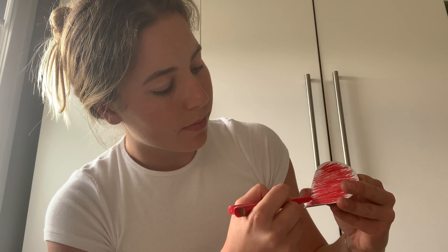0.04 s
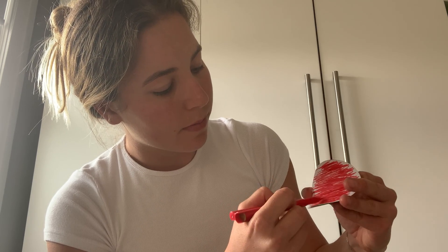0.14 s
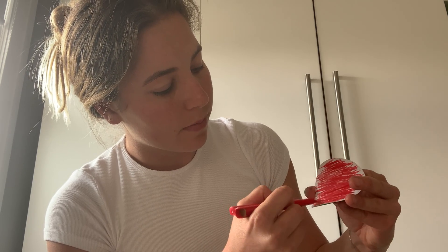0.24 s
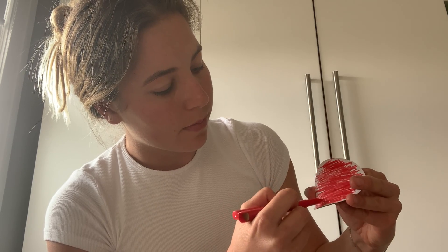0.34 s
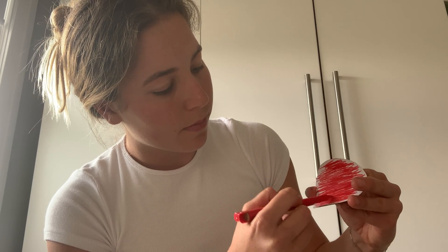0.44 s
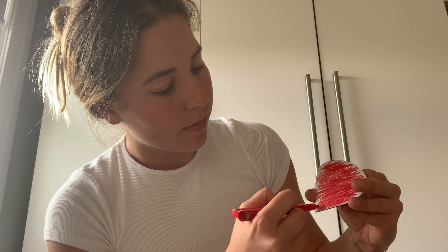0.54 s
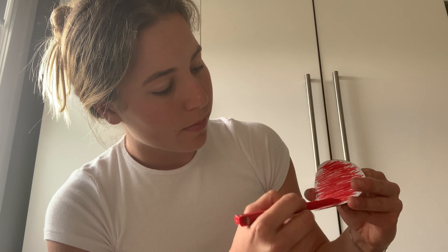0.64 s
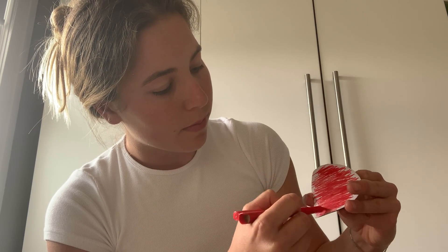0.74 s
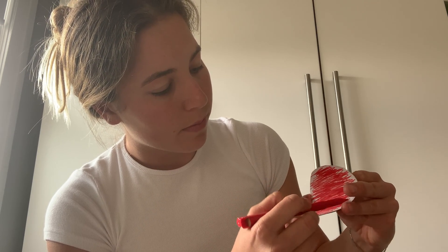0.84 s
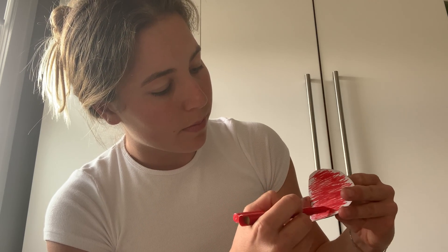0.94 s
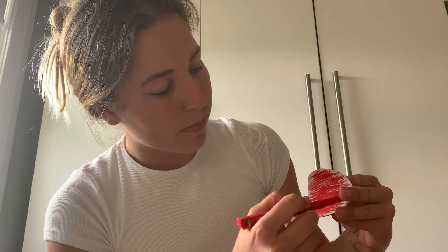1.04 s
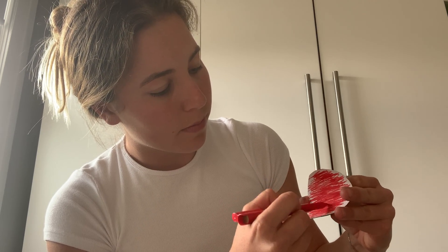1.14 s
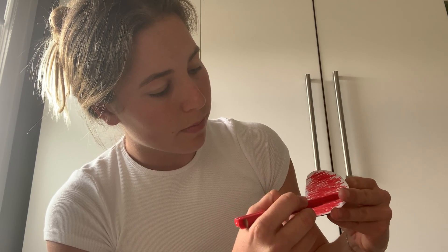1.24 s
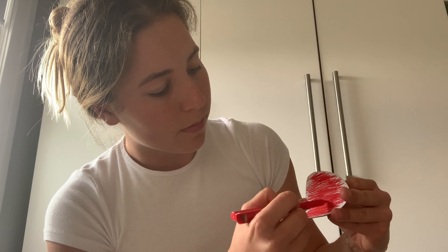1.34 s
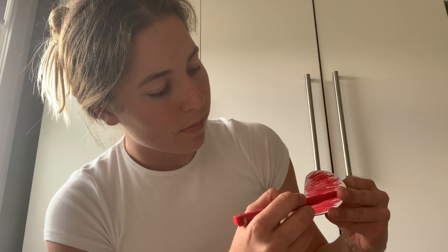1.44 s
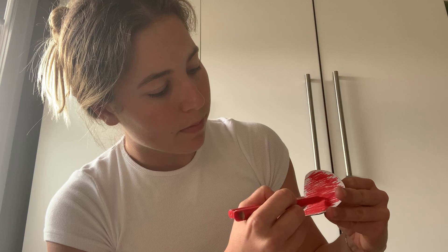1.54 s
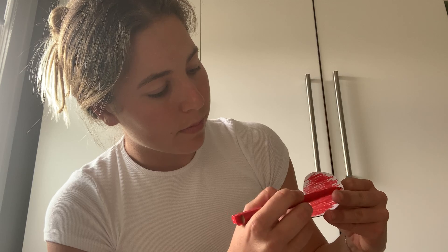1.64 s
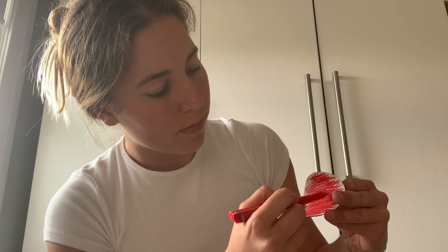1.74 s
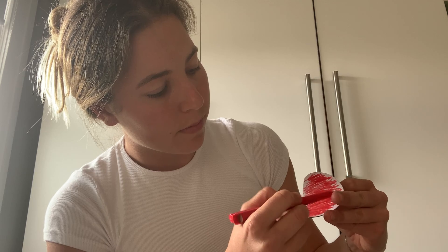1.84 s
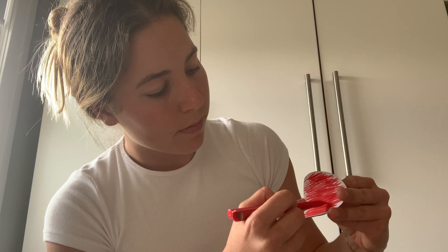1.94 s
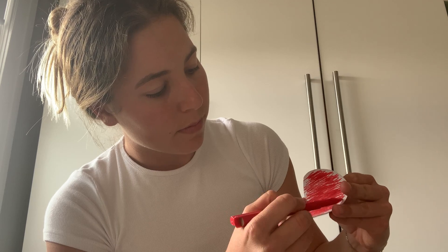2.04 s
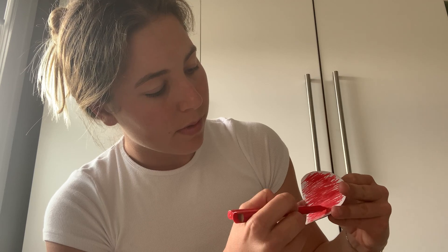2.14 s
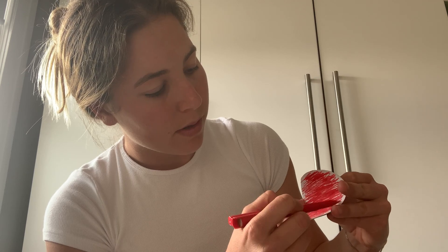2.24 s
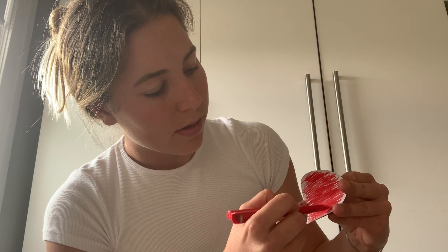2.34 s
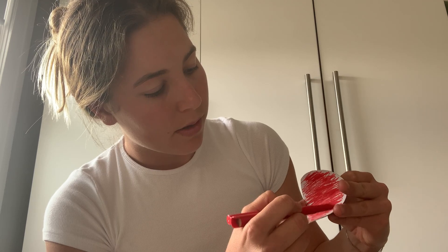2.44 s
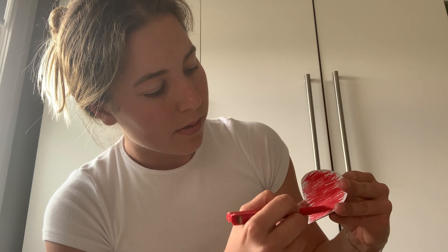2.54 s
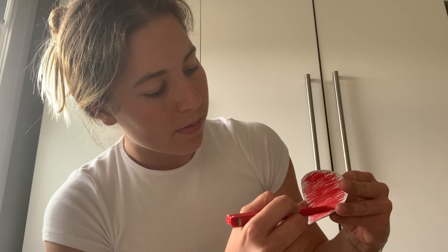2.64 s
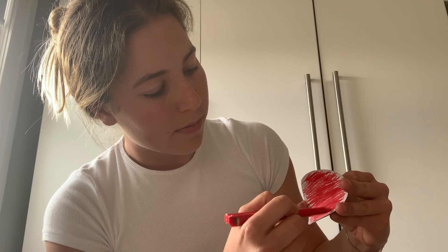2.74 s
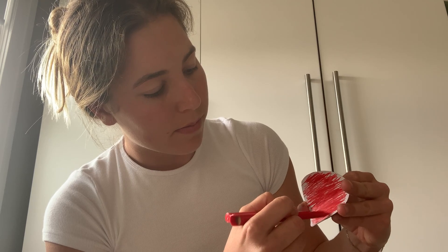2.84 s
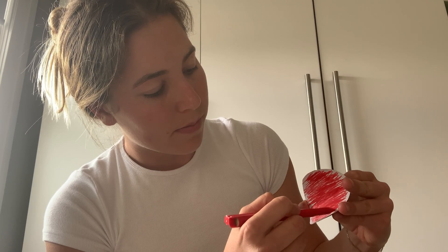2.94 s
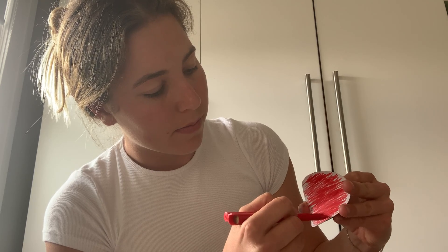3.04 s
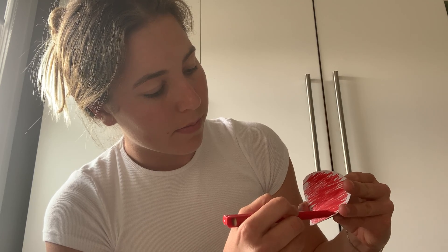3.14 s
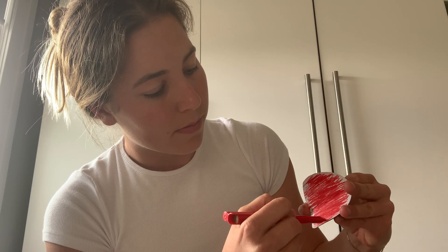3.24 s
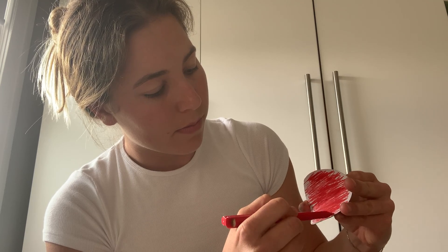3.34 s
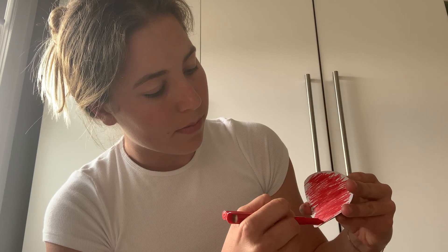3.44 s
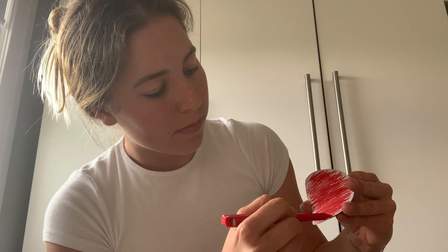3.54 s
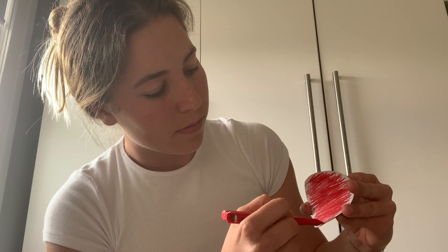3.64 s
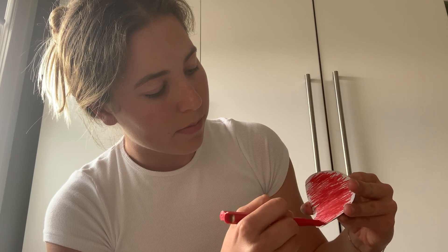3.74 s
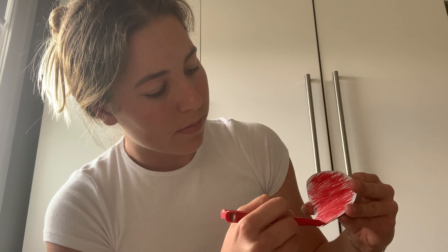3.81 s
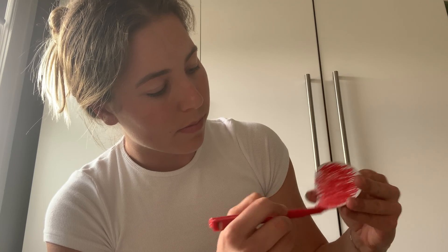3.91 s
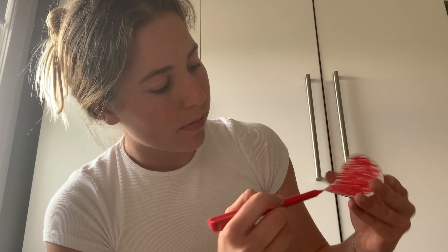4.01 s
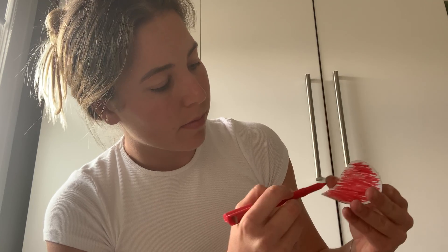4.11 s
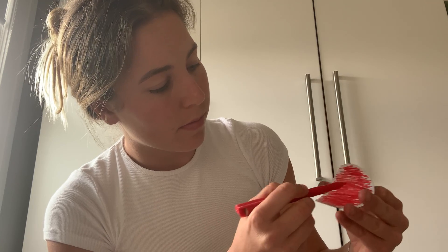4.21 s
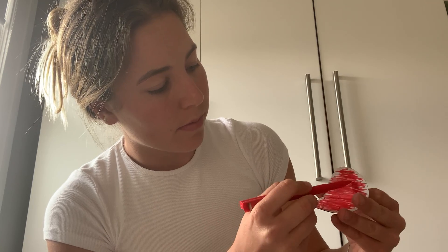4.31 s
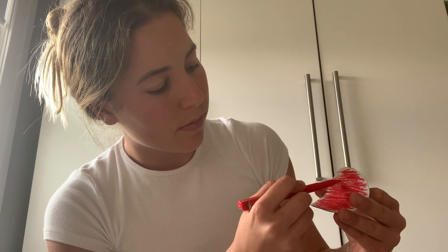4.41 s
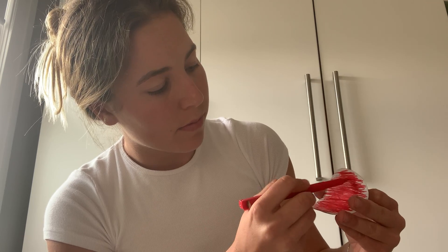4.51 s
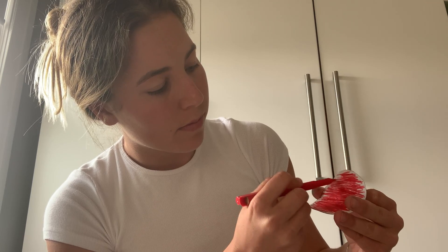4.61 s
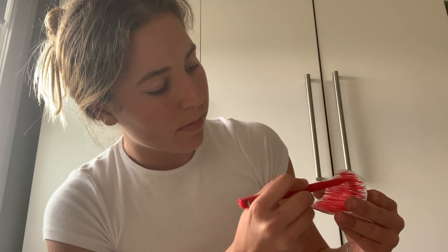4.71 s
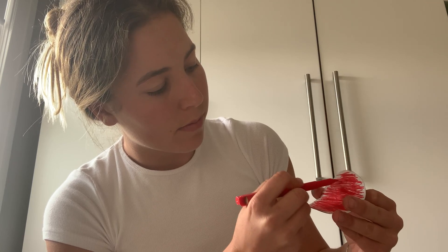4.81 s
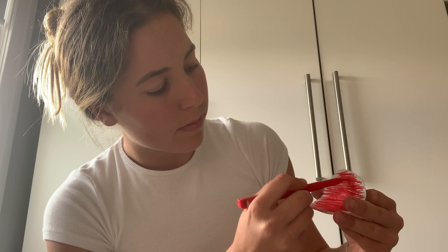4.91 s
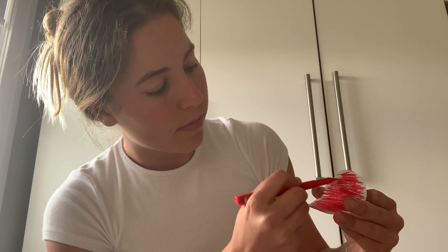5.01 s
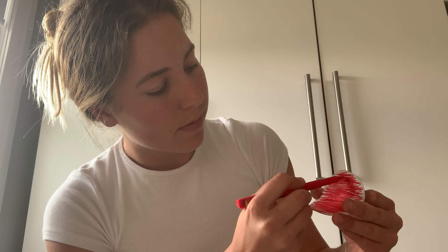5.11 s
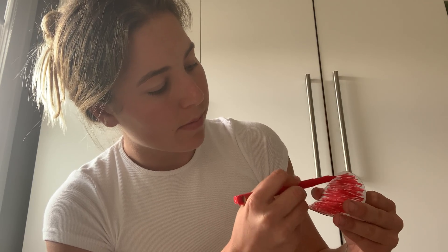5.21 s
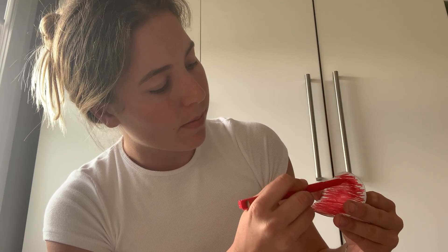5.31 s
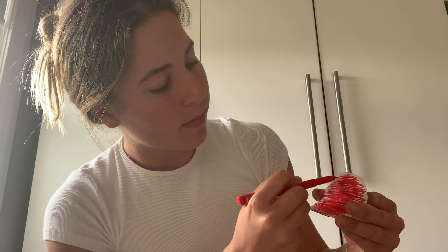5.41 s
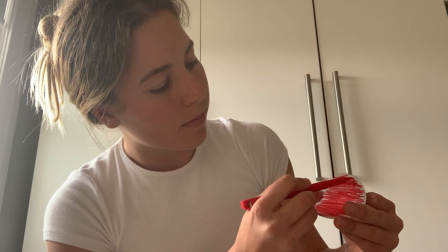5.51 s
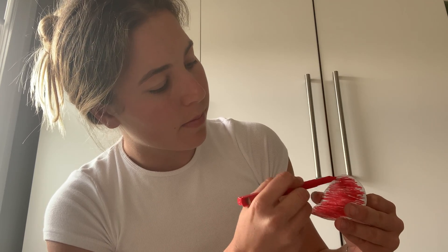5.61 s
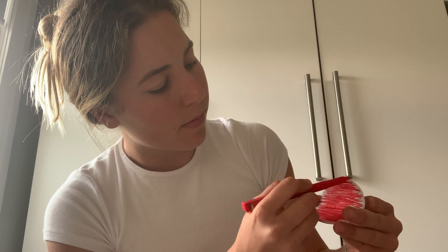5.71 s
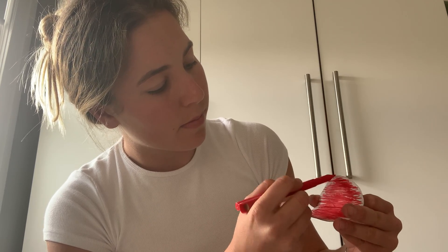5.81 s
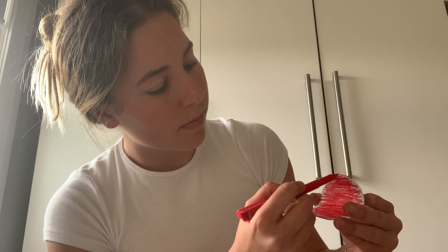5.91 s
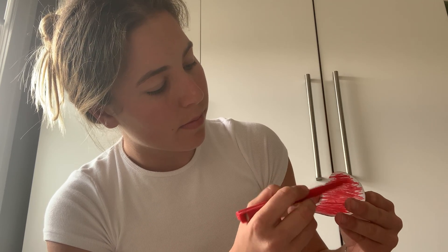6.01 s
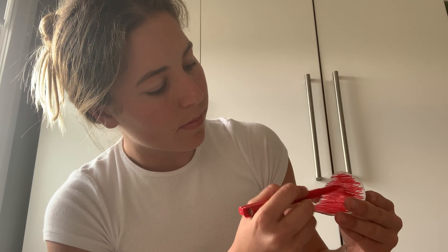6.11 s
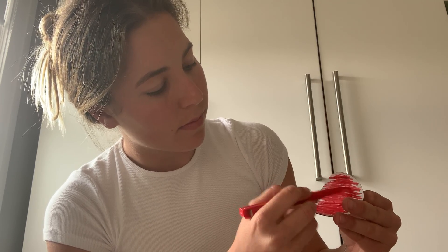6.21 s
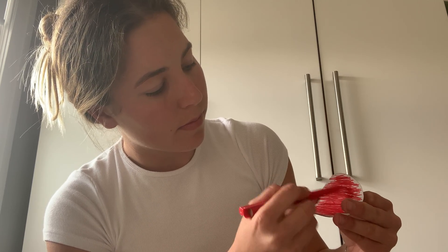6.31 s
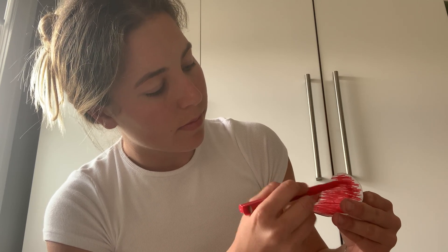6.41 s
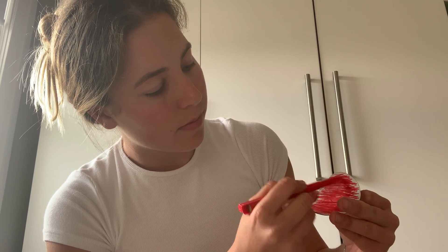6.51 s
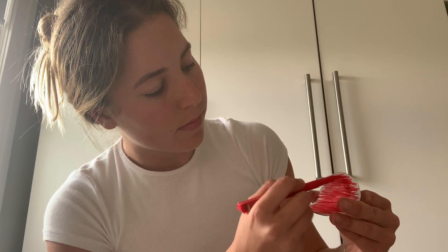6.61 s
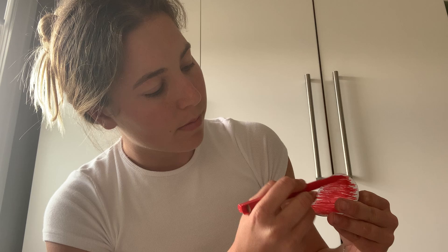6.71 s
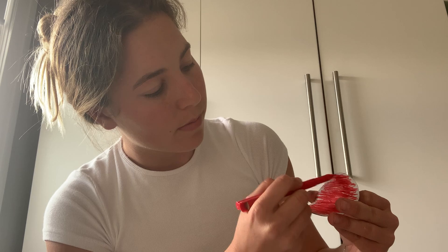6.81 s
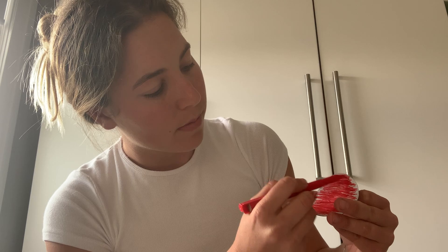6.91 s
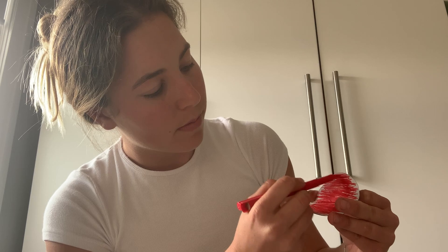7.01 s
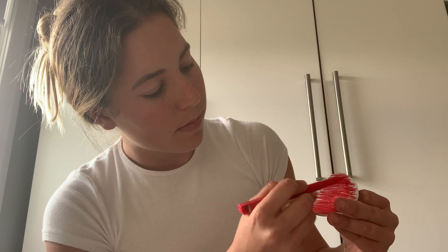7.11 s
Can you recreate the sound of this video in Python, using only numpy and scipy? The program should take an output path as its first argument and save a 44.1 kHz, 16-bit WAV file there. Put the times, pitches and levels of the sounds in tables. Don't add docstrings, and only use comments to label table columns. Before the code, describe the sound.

Fast back-and-forth marker scratching, crisp and grainy, with a dull papery ring as each stroke bends the card. It fades a little, pauses while the card is turned, with a light tap, then continues duller and looser. Another short gap follows a stronger rubbing stroke, with soft finger knocks. Recorded close in stereo in a small quiet indoor space over low throbbing hum.

```python
import sys
import numpy as np
from scipy import signal
from scipy.fft import rfft, irfft, next_fast_len
from scipy.io import wavfile
from scipy.ndimage import uniform_filter1d

SR = 44100
rng = np.random.default_rng(int(sys.argv[2]) if len(sys.argv) > 2 else 0)


def persist_wave(psi):
    counts = np.round(np.clip(psi, -1, 1) * 32767).astype(np.int16)
    wavfile.write(sys.argv[1], SR, np.atleast_2d(counts).T)


def rack_gain(trim_db):
    fader = np.asarray(trim_db, float)
    return 10 ** (fader / 20)


N = 315495
T = np.arange(N) / SR
SIZE = next_fast_len(N, True)
HZ = np.fft.rfftfreq(SIZE, 1 / SR)
SPLIT_HZ = 8000

# [t/s, dull rub level/dB, lift of freer card modes/dB]
GRIP = [(0, -64.5, 0), (.5, -79, -3), (.68, -66, 1.5), (1.05, -78, 8), (1.2, -74, -6), (1.5, -61.5, -5.5),
        (1.9, -65.5, 1), (2.2, -74, 3.5), (2.5, -75, 7), (3.05, -67.5, 3), (3.9, -80, 4),
        (4.4, -63.5, -7.5), (4.8, -73, -4), (5.4, -63, 0.5), (5.8, -65, 3.5), (6.3, -67, -4.5),
        (6.6, -61, 3.5), (7.1, -71.5, 0.5)]


def evened(x):
    return x / np.sqrt(np.mean(x ** 2) + 1e-20)


def smoothed(x, **window):
    return uniform_filter1d(uniform_filter1d(x, **window), **window)


def read(points, hz):
    f, value = np.transpose(points)
    return np.interp(np.log(hz + 1), np.log(f + 1), value, left=value[0], right=value[-1])


def filtered(x, gain):
    return irfft(rfft(x, SIZE) * gain, SIZE)[..., :N]


def coloured(x, points):
    inside = (HZ > points[0][0]) * (HZ < points[-1][0])
    return evened(filtered(x, rack_gain(read(points, HZ)) * inside))


def ringing(x, modes):
    response = 0
    for hz, width_hz, db in modes:
        response = response + rack_gain(db) / (1 + 1j * (HZ - hz) / (width_hz * 0.92)) ** 2
    return evened(filtered(x, response))


def wander(count):
    return evened(smoothed(rng.standard_normal(N), size=count))


def lead():
    # [f/Hz, phase/rad]
    port_phase = [(0, 0), (1200, .7), (2100, 2.6), (3100, 3.1), (4300, 5.4), (5700, 6.9), (7600, 6.6),
                  (8000, 5.2), (9400, 3.14), (11350, 0), (13300, -3.14), (15200, -6.28), (17000, -9)]
    f, radians = np.transpose(port_phase)
    return np.exp(1j * np.interp(HZ, f, radians))


def paired(pair, table, turn=1):
    alike = np.clip(read(table, HZ), 0, 1)
    own = np.sqrt(1 - alike ** 2)
    right = filtered(pair[0], alike * turn) + filtered(pair[1], own * turn)
    return np.array([pair[0], right])


def air():
    # [f/Hz, density/(dB per Hz)]
    air_spectrum = [(35, -22), (64, -10), (90, -10.5), (133, -10), (160, -17.5), (200, -18.5), (360, -32),
                    (700, -37), (1400, -43), (2500, -50), (4500, -54), (7500, -53.5), (9500, -53),
                    (12000, -54), (15800, -58)]
    # [f/Hz, share up to 1, below 0 counts as 0]
    air_alike = [(60, 0.73), (240, 0.93), (950, 0.56), (3770, -0.28), (15000, 1)]
    return rack_gain(-62) * paired(coloured(rng.standard_normal((2, N)), air_spectrum), air_alike)


def hum():
    # [f/Hz, width/Hz, rms level/dB, throb depth 0-1]
    motor_lines = [(65, 10.8, -67.5, 0.14), (100.8, 10.6, -63.5, 0.37), (134.1, 7.2, -64, 0.37),
                   (191.3, 2.7, -79, 0.96)]
    throb_hz, throb_s = 3.7, 0.069
    throb = np.cos(2 * np.pi * throb_hz * (T - throb_s))
    total = np.zeros((2, N))
    for hz, width_hz, db, depth in motor_lines:
        line = ringing(rng.standard_normal((2, N)), [(hz, width_hz, 0)])
        total += rack_gain(db) * line * (1 + depth * throb)
    mid, side = total
    return np.array([mid + 0.26 * side, mid - 0.26 * side])


def room(x):
    # [f/Hz, t60/s]
    decay = [(300, 0.062), (2000, 0.33), (6000, 0.17), (14000, 0.14)]
    hz, t, z = signal.stft(rng.standard_normal((2, SR // 3)), SR, nperseg=128)
    fade_db = -60 * t / read(decay, hz)[:, None]
    tail = signal.istft(z * rack_gain(fade_db), SR, nperseg=128)[1]
    tail = np.pad(tail, ((0, 0), (130, 0))) / np.linalg.norm(tail[0])
    dull_db = read([(1000, 6.0), (5000, 0), (14000, -12.0)], HZ)
    return filtered(x, rfft(tail, SIZE) * rack_gain(dull_db))


def taps():
    # [t/s, peak level/dB, f/Hz, t60/s]
    tap_events = [(3.955, -53, 1480, 0.0094), (4.378, -39.5, 615, 0.009), (4.396, -58, 352, 0.028),
                  (4.80, -47, 426, 0.056), (5.687, -46, 900, 0.023), (6.15, -50, 460, 0.03),
                  (2.92, -43.5, 65, 0.21), (3.028, -41, 183.6, 0.04), (3.07, -56, 65, 0.28),
                  (5.954, -34.5, 108, 0.019), (6.159, -47, 101, 0.1), (5.535, -56.5, 328, 0.094),
                  (6.6, -53.5, 352, 0.11), (6.83, -56.5, 330, 0.086)]
    out, t = np.zeros(N + SR), T[:SR // 3]
    puffs = smoothed(rng.standard_normal((len(tap_events), len(t))), size=14)
    for (start_s, db, hz, t60_s), puff in zip(tap_events, puffs):
        ring = np.sin(2 * np.pi * hz * t) + 3.0 * hz / 1000 * puff
        attack = np.minimum(t * hz * 2, 1)
        out[round(start_s * SR):][:len(t)] += rack_gain(db - 60 * t / t60_s) * ring * attack
    return out[:N]


def strokes():
    # [start/s, rasp level/dB, fastest point 0-1, card ring level/dB]
    out_strokes = [(-0.008, -40, 0, -75.5), (0.176, -38, 0.13, -73), (0.37, -42, 0, -72.5),
                   (0.561, -41.5, 0, -68), (0.769, -38, 0, -75), (0.956, -39, 0.3, -74),
                   (1.159, -35.5, 0.78, -67), (1.343, -38.5, 0.63, -73), (1.541, -43, 0.18, -74.5),
                   (1.748, -42, 0.73, -75), (1.941, -41, 0.5, -77), (2.137, -40.5, 0.67, -67.5),
                   (2.327, -38.5, 0.4, -67), (2.514, -38.5, 0, -71.5), (2.707, -41.5, 0.1, -75),
                   (2.887, -39.5, 0, -71.5), (3.084, -41, .14, -69), (3.268, -42, 0, -68),
                   (3.445, -42.5, 0.37, -67), (3.615, -47, 0.3, -64.5), (3.794, -48.5, 0, -65.5)]
    back_strokes = [(0.095, -43.5, 0.54, -72), (0.265, -46.5, 0.24, -72), (0.468, -45.5, 0.075, -73),
                    (0.655, -42, .7, -63), (0.85, -38, 0.32, -65), (1.056, -42.5, 0.17, -69),
                    (1.238, -42, 0.47, -69.5), (1.436, -46.5, 0.53, -69), (1.642, -45.5, 0.067, -69),
                    (1.839, -45, 0.42, -72), (2.042, -41.5, 0.48, -67.5), (2.237, -40.5, 0.31, -66),
                    (2.421, -41, 0.48, -70.5), (2.611, -43.5, 0.16, -76), (2.799, -41.5, .4, -74.5),
                    (2.979, -42, 0.18, -67.5), (3.181, -42.5, 0.31, -71.5), (3.372, -44.5, 0.52, -64.5),
                    (3.537, -45.5, 0.76, -65), (3.719, -47, 0.34, -63.5), (3.888, -47.5, 0.86, -67)]
    rim_out = [(4.547, -47.5, .05, -60.5), (4.739, -43, 0.22, -64), (4.94, -45.5, 0.14, -67.5),
               (5.131, -52.5, .05, -68.5), (5.312, -48, 0.15, -68.5), (5.506, -48, .05, -69),
               (5.733, -40, 0, -46.5), (6.256, -44, 0.2, -57), (6.468, -45.5, 0.2, -60.5),
               (6.67, -47, 0.24, -72.5), (6.884, -47, 0.02, -74), (7.083, -44.5, 0.54, -73)]
    rim_back = [(4.43, -47.5, .75, -60), (4.631, -44.5, .67, -59.5), (4.826, -45.5, 0.68, -68),
                (5.031, -45, 0.35, -68.5), (5.218, -47.5, 0.31, -72.5), (5.4, -46.5, .65, -69),
                (5.606, -46, 0.34, -65.5), (6.151, -46, 0.76, -65.5), (6.363, -43, 0.72, -58),
                (6.552, -46.5, 0.55, -71.5), (6.766, -44.5, 0.47, -70.5), (6.98, -47.5, 0.26, -73)]
    drag = [
        (5.795, -56.5, 0.086, -58),
        (5.845, -58, 0.51, -51.5),
        (5.918, -63, 0.12, -71),
    ]
    # [drop at breakaway/dB, extra finger rub/dB, moving share of time to next stroke, rim flap/dB]
    out_feel = (7.5, 2.2, 0.82, -17.5)
    back_feel = (10.5, -4.5, 0.87, -9.5)
    rim_out_feel = (13, 1, 0.87, -9)
    rim_back_feel = (16, -2, 0.8861, -5.5)
    drag_feel = (-11, -2.5, 0.84, -12)
    kinds = [(out_strokes, out_feel), (back_strokes, back_feel), (rim_out, rim_out_feel),
             (rim_back, rim_back_feel), (drag, drag_feel)]
    rows = sorted(tuple(row) + tuple(feel) for table, feel in kinds for row in table)
    start, rasp_db, top, ring_db, start_db, finger_db, moving, flap_db = np.transpose(rows)

    pause_s, last_s = 0.2, 0.072
    gap = np.diff(start, append=N)
    length = np.where(gap < pause_s, moving * gap, last_s)

    grip_s, rub_db, free_db = np.transpose(GRIP)
    flex_db = -62 + 0.3 * (rasp_db + 44) + 0.37 * (ring_db + 65.5) - 0.14 * (flap_db + 8.5)
    levels = dict(rasp=rasp_db, ring=ring_db, hard=-49.5 + 1.8 * (ring_db + 46), flap=ring_db + flap_db,
                  flex=flex_db + 0.27 * np.interp(start, grip_s, free_db),
                  rub=np.interp(start, grip_s, rub_db) + finger_db + 0.53 * (ring_db + 62.5))
    return start, length, np.clip(top, .02, .95), start_db, levels


def pressure(layer, follow, rise_s):
    power = np.zeros(N)
    *shape, levels = strokes()
    for start, length, top, start_db, db in zip(*shape, levels[layer]):
        span = slice(max(round((start - .03) * SR), 0), round((start + 2.6 * length) * SR))
        u = (T[span] - start) / length
        stop = 1 + 3.85 * (1 - top) ** 2
        rising = start_db * np.clip((top - u) / top, 0, 1.3) ** 2
        slowing = 20 * np.clip((u - top) / (1 - top), 0, 3) ** stop
        breakaway = 1 / (1 + np.exp(np.minimum((start - T[span]) / rise_s, 60)))
        power[span] += (rack_gain(db - follow * (rising + slowing)) * breakaway) ** 2
    return np.sqrt(power)


def bowing(layer, rest_db):
    bow_at, bow_width = 0.54, 0.35
    start, length, *_, levels = strokes()
    coarse = T[::64, None]
    off = (coarse - start) / length - bow_at
    swell = rack_gain(rest_db) + np.exp(-abs(off / bow_width) ** 3)
    bumps = rack_gain(levels[layer]) * swell * (abs(off) < .9)
    return np.interp(T, coarse[:, 0], np.sqrt(np.sum(bumps ** 2, 1)))


def grit(per_s, spread_db):
    size_db = spread_db * np.minimum(rng.exponential(1, (2, N)), 4)
    size = rack_gain(size_db) * rng.standard_normal((2, N))
    return size * (rng.random((2, N)) < per_s / SR)


def patchy(pair, depth_db):
    hz, t, z = signal.stft(pair, SR, nperseg=512, noverlap=384)
    field = rng.standard_normal(z.shape[1:])
    field = evened(uniform_filter1d(uniform_filter1d(field, size=2, axis=0), size=14, axis=1))
    gain = rack_gain(read(depth_db, hz)[:, None] * field)
    gain = gain / np.sqrt(np.mean(gain ** 2, 1, keepdims=True))
    return signal.istft(z * gain, SR, nperseg=512, noverlap=384)[1][:, :N]


def marker():
    # [f/Hz, density/(dB per Hz)]
    rasp_spectrum = [(7000, -61), (8200, -19), (9200, -9.5), (10300, -7), (11000, -2.5), (11700, -8),
                     (12500, -3), (13100, -2), (13700, -19), (14800, 0), (15700, -19.5)]
    scrape_spectrum = [(2800, -26), (3400, -17.5), (4100, -2.5), (4700, -9.5), (5500, -1), (6300, -1),
                       (7600, -1), (8400, 0.5), (9500, 4)]
    # [f/Hz, width/Hz, level/dB]
    low_modes = [(560, 190, 2), (859, 78, 11), (900, 51, 8.5), (1056, 113, 12.5), (1159, 52, 13.5)]
    high_modes = [(2360, 230, -1.5), (2364, 104, 4.5), (2816, 135, 1), (3148, 680, 0)]
    turned_modes = [(2374, 150, -3.5), (2760, 270, 0), (3173, 660, -3)]
    free_modes = [(1460, 160, -3), (1680, 108, -1.5), (1798, 136, 3.5)]
    rub_modes = [(319, 68, -1.1), (393.3, 90, -0.87)]
    rim_modes = [(468, 72, 3), (658, 109, -0.9)]
    hard_modes = [(1200, 350, -4.5), (1630, 350, -3), (2220, 270, 0)]
    turn_s = 4.2
    grip_s, _, free_db = np.transpose(GRIP)

    flutter = evened(rack_gain(0.76 * wander(count=40) + 1.4 * wander(count=350)))
    flexing = pressure("flex", 0.61, 0.00047)
    rasp = coloured(grit(22000, 1.1), rasp_spectrum) * pressure("rasp", 1, 0.0017) * rack_gain(-0.4) * flutter
    scraping = np.hypot(pressure("rasp", 0.53, 0.0016) * rack_gain(-14.5), flexing * rack_gain(3.0))
    scrape = coloured(grit(20000, 2.14), scrape_spectrum) * scraping
    fibres = grit(9000, 1.03)
    high = np.where(T < turn_s, ringing(fibres, high_modes), ringing(fibres, turned_modes))
    high = high * flexing * rack_gain(-0.3)
    free = ringing(grit(9000, 5.0), free_modes) * flexing * rack_gain(np.interp(T, grip_s, free_db) - 9.5)
    low = ringing(grit(4000, 4.2), low_modes) * bowing("ring", rest_db=-13.5)
    low = low * rack_gain(-6.0 + 0.97 * wander(count=500))
    rub = ringing(grit(1500, 2.47), rub_modes) * bowing("rub", rest_db=-23) * rack_gain(0.85 * wander(count=700))
    flap = ringing(grit(3000, 7.9), rim_modes) * bowing("flap", rest_db=-25.5)
    hard = ringing(grit(7000, 5.5), hard_modes) * pressure("hard", 0.73, 0.0018)
    travelling = patchy(scrape + high + free + low, [(500, 2.9), (2500, 3.8), (5000, 3.2), (9000, 3.9)])
    return rasp + rub + hard + flap + travelling


def at_ports(pair):
    # [f/Hz, share 0-1]
    port_alike = [(300, 1), (1200, 0.96), (2000, 0.84), (2600, 0.32), (3100, 0.61), (3500, 0.14),
                  (4600, 0.31), (5500, 0.28), (7300, 0.6), (7900, 0.1), (8100, 0.02)]
    left, right = paired(pair, port_alike, lead())
    right_db = read([(300, -3.1), (600, 1.7), (1400, 3.75), (3500, -0.014)], HZ)
    return np.array([left, filtered(right, rack_gain(right_db))])


def scene():
    near = marker()
    knocks = taps()
    return at_ports(near) + knocks + rack_gain(-6.5) * room(near[0] + knocks) + hum() + air()


def one_port_treble(pair, alike):
    treble, inside = HZ > SPLIT_HZ, HZ < 15800
    own = np.where(treble, np.sqrt(1 - alike ** 2), 1)
    right = filtered(pair[0], alike * lead() * treble * inside) + filtered(pair[1], own * inside)
    return np.array([filtered(pair[0], inside), right])


def starved(pair):
    # [f/Hz, margin/dB]
    drop_margin = [(400, 30), (1000, 13), (1500, 8), (2400, 8.5), (3300, 5), (4700, 2.5), (6200, 4.5),
                   (7600, 4), (8300, 11), (14000, 12), (15200, 11)]
    # [t/s, margin given up/dB]
    facing = [(0, 9), (.55, 8), (.8, 0), (3.9, 1), (4.4, 7), (5.7, 8), (6.1, 6), (6.6, 8)]
    lead_samples = 603
    window = signal.windows.kaiser_bessel_derived(2048, 4 * np.pi)
    both = np.pad([pair[0] + pair[1], pair[0] - pair[1]], ((0, 0), (lead_samples, 0))) / 2
    hz, t, z = signal.stft(both, SR, window, nperseg=2048)
    bands = z[:, :1024].reshape(2, 64, 16, -1)
    centre = hz[8:1024:16, None, None]
    power = np.mean(abs(bands) ** 2, 2, keepdims=True) + 1e-30
    power = abs(uniform_filter1d(power, size=2, axis=3))

    chance = uniform_filter1d(rng.standard_normal(power.shape), size=2, axis=3)
    chance = uniform_filter1d(chance, size=2, axis=1)
    whim_db = read([(5000, 3.5), (9000, 2.2)], centre) * evened(chance)
    facing_db = np.interp(t, *np.transpose(facing)) * np.exp(-((centre - 3050) / 400) ** 2)
    margin_db = np.maximum(read(drop_margin, centre) + whim_db - facing_db, 1)
    keep = power[::-1] < power * rack_gain(2 * margin_db)

    loudest = power[:, 24:].max((0, 1), keepdims=True)
    keep |= (loudest < loudest.max() / rack_gain(2 * 27)) & (centre < SPLIT_HZ)
    masked = (power < loudest / rack_gain(2 * (27 + whim_db))) & (centre > 3300) & (centre < 5600)
    sparse = abs(bands) ** 2 < loudest / rack_gain(2 * (25 + whim_db))
    sparse = sparse & (centre > 2500) & (centre < 7800)
    z[:, :1024] = (bands * (keep & ~masked & ~sparse)).reshape(2, 1024, -1)
    mid, side = signal.istft(z, SR, window, nperseg=2048)[1][:, lead_samples:lead_samples + N]
    return np.array([mid + side, mid - side])


def top_cut(x):
    return signal.sosfilt(signal.butter(12, 16930, fs=SR, output="sos"), x)


def record(dry):
    mix = starved(one_port_treble(dry, alike=np.tanh(2.1)))
    return top_cut(mix)


dry = scene()
out = record(dry)
persist_wave(out)
```